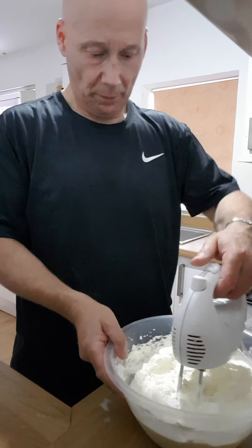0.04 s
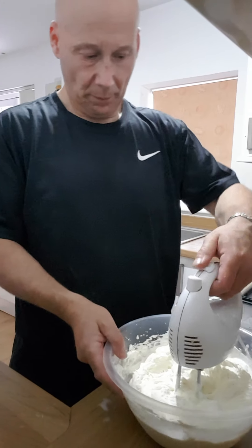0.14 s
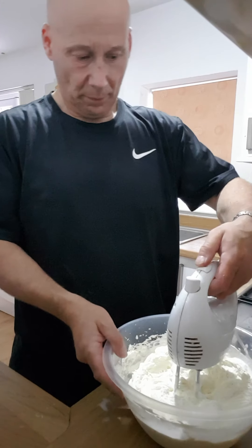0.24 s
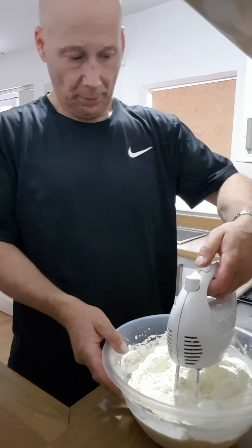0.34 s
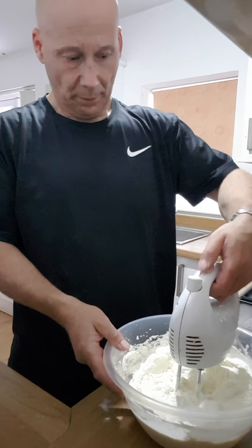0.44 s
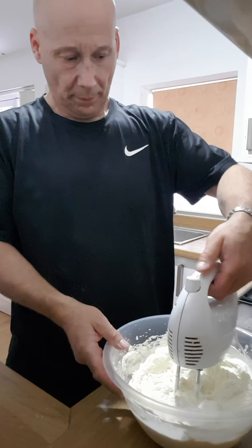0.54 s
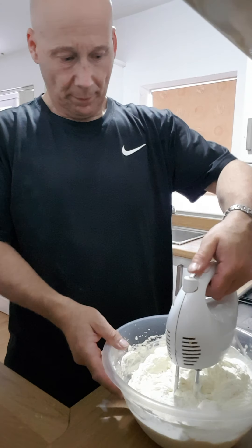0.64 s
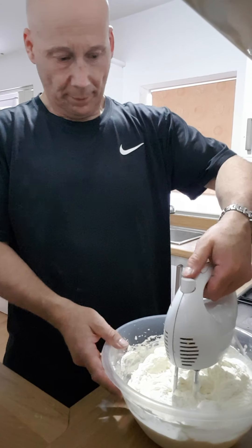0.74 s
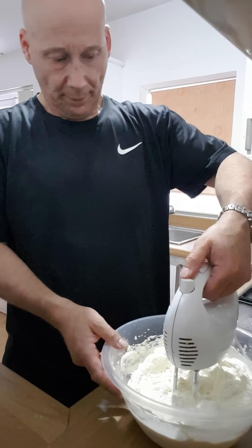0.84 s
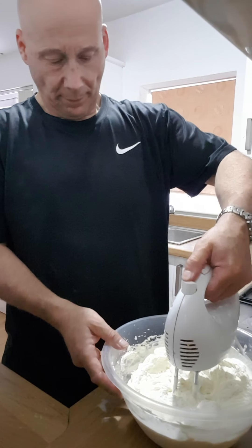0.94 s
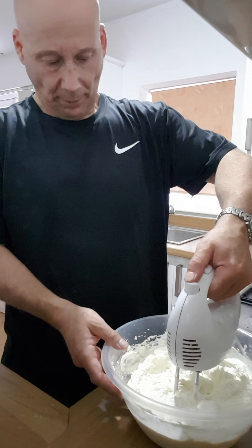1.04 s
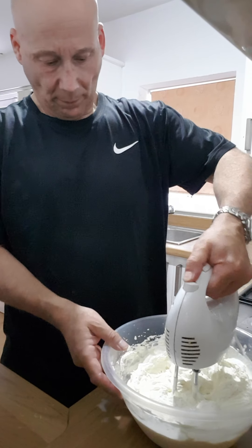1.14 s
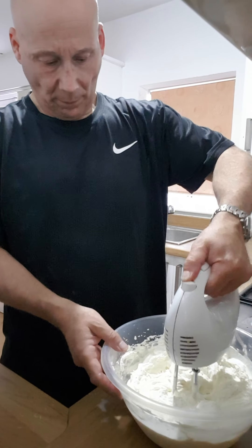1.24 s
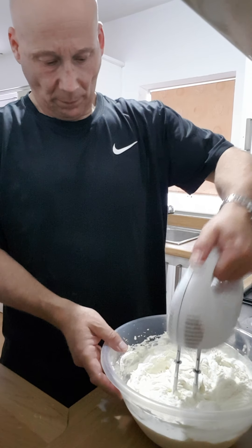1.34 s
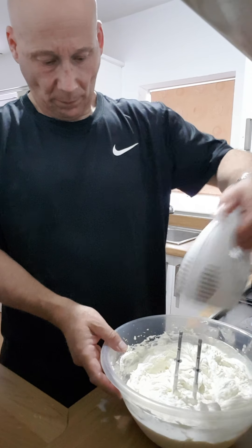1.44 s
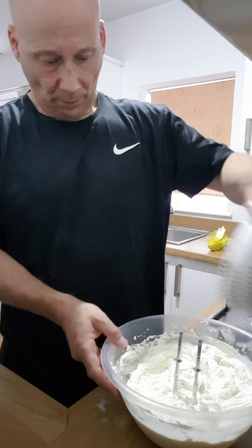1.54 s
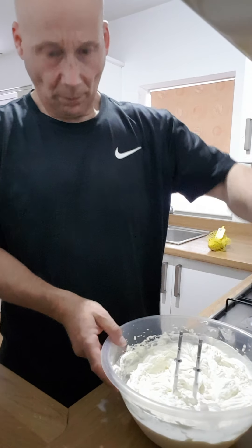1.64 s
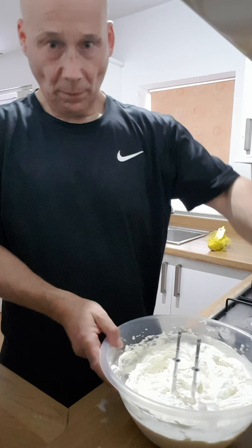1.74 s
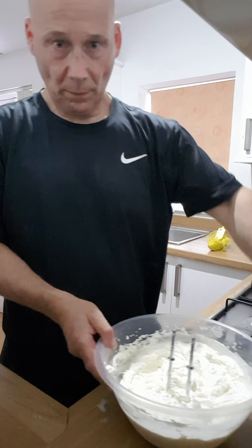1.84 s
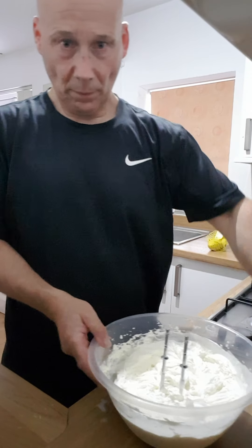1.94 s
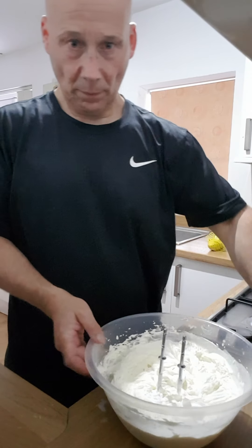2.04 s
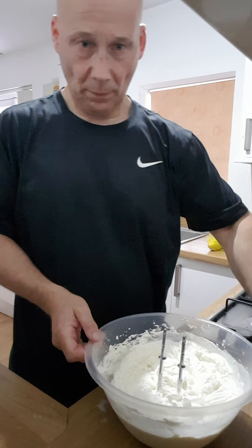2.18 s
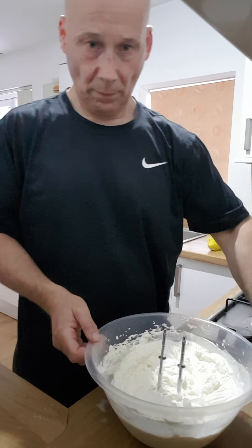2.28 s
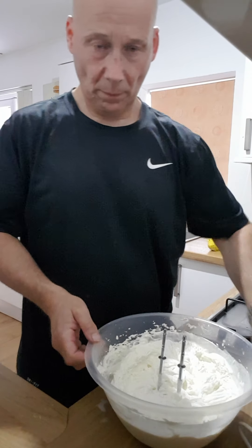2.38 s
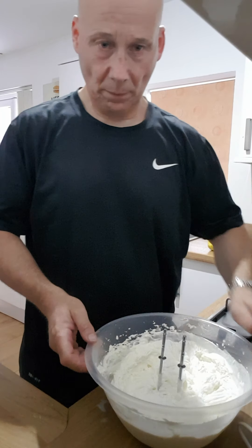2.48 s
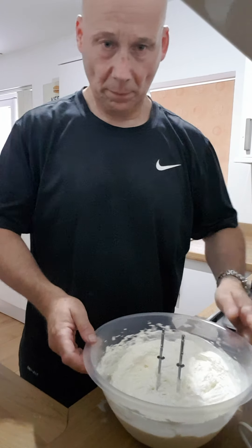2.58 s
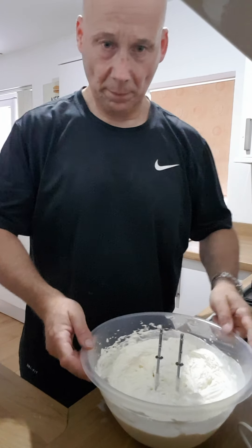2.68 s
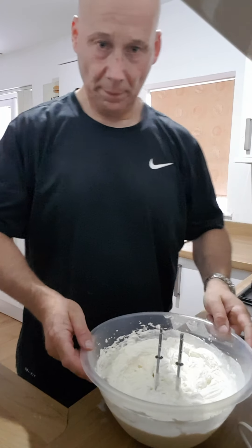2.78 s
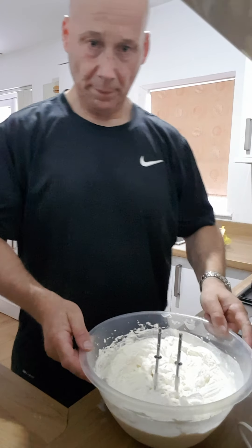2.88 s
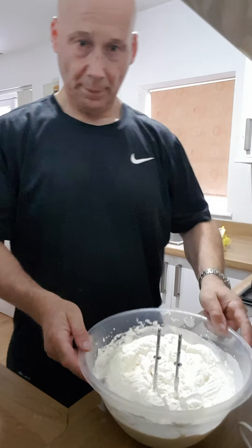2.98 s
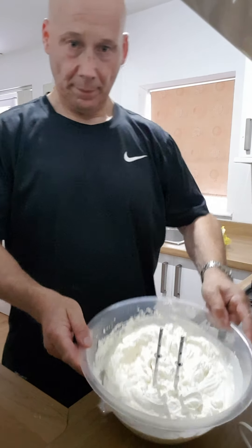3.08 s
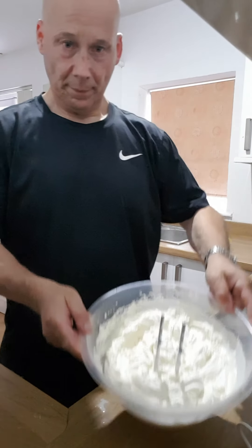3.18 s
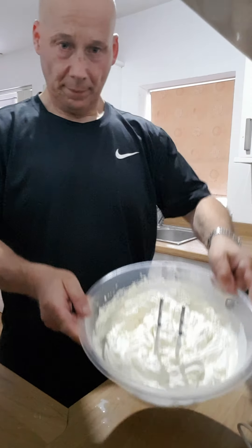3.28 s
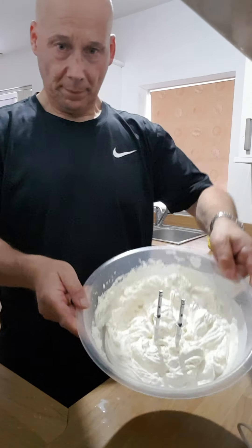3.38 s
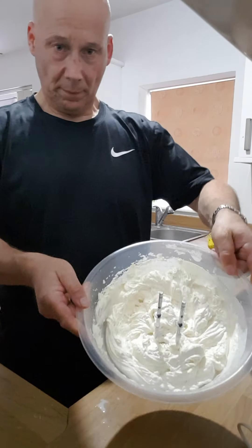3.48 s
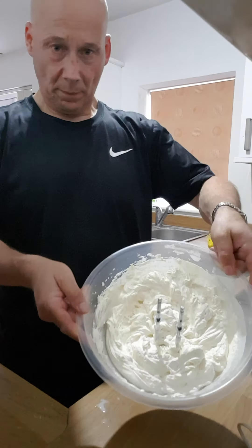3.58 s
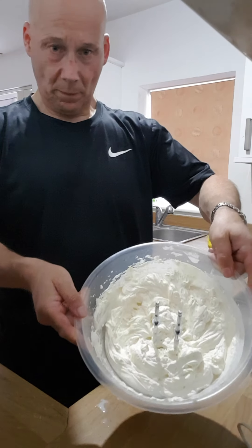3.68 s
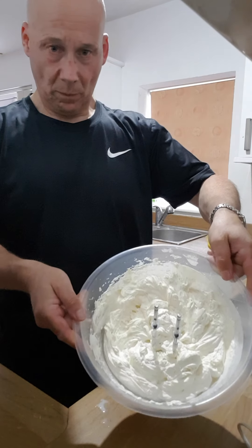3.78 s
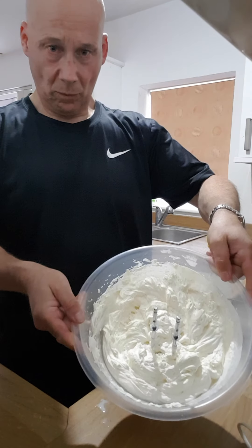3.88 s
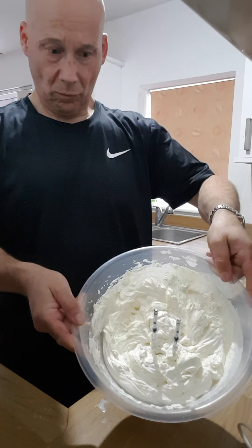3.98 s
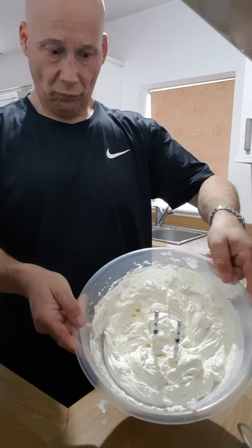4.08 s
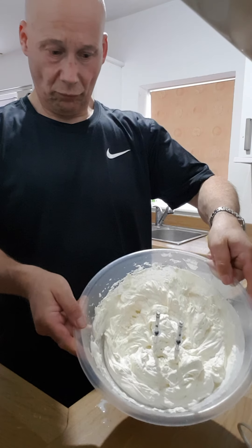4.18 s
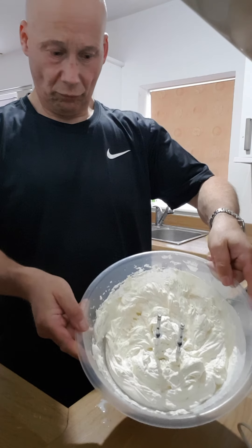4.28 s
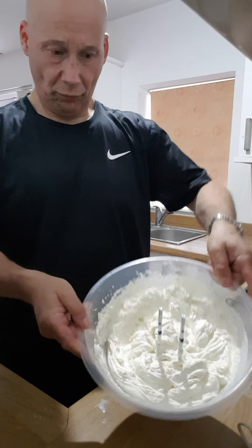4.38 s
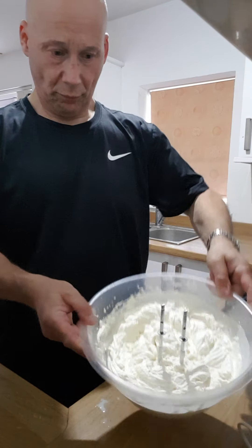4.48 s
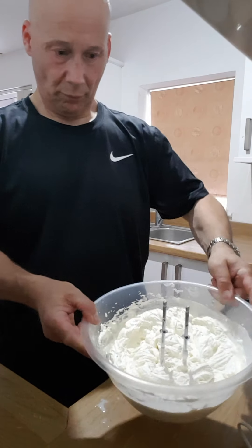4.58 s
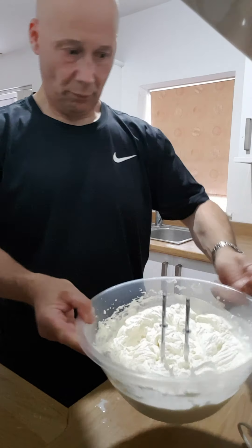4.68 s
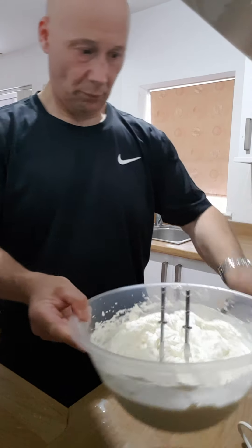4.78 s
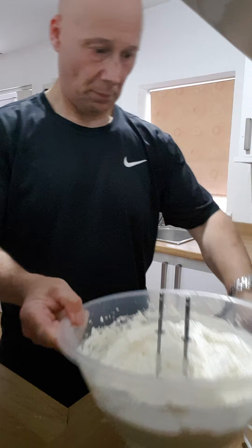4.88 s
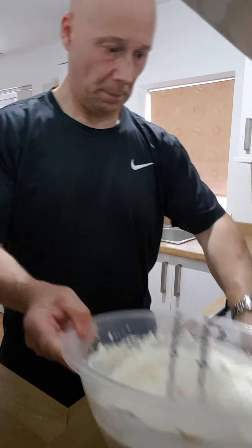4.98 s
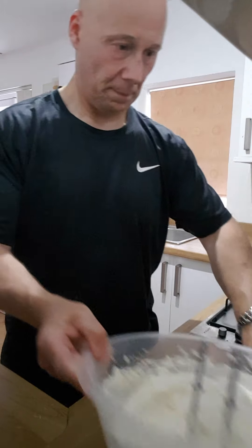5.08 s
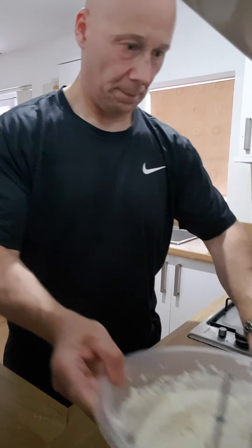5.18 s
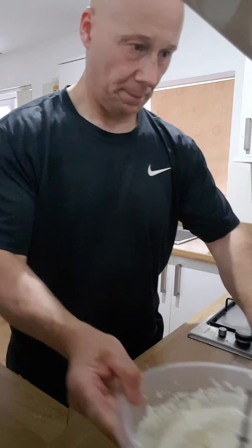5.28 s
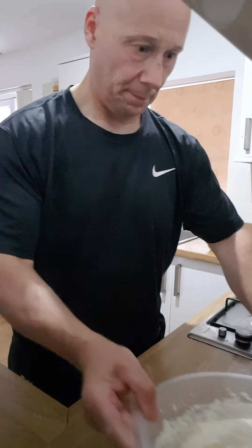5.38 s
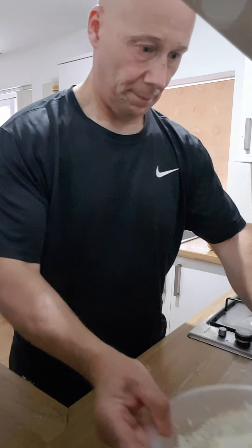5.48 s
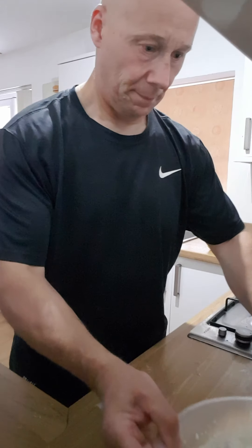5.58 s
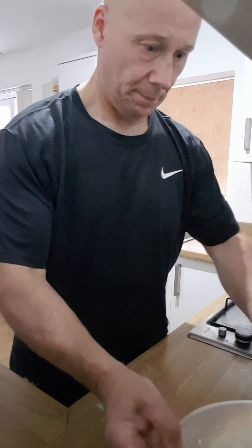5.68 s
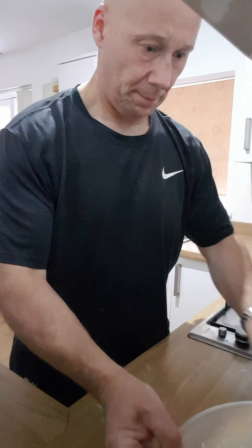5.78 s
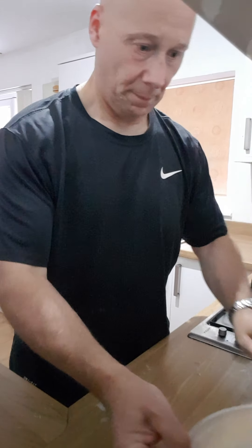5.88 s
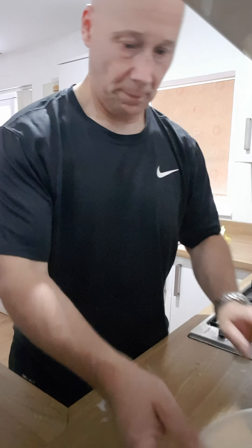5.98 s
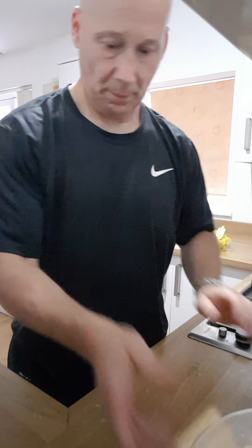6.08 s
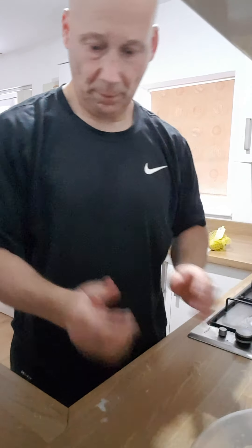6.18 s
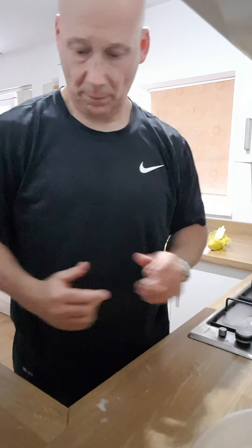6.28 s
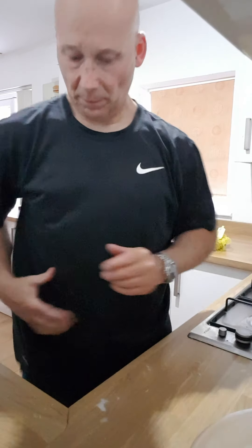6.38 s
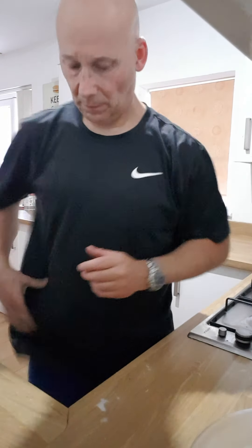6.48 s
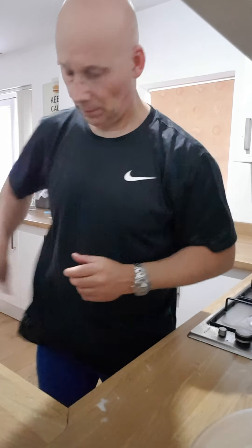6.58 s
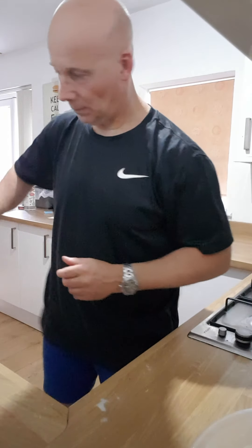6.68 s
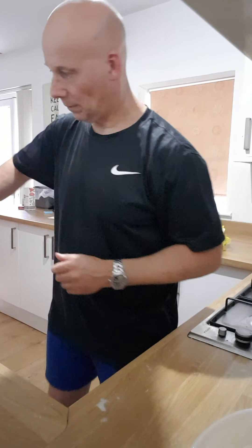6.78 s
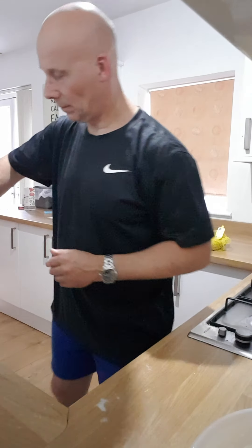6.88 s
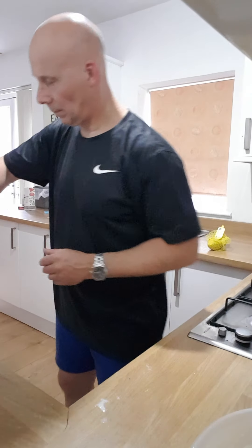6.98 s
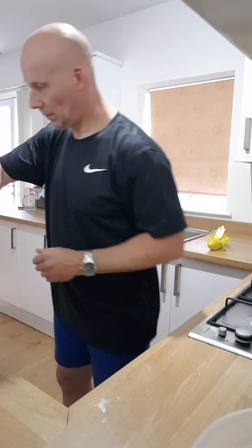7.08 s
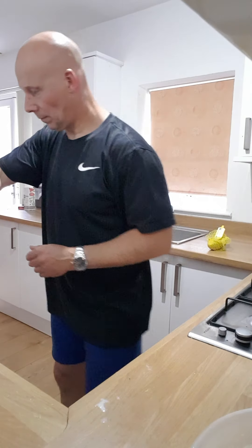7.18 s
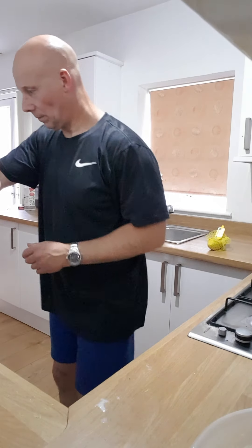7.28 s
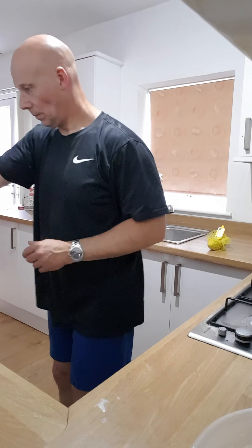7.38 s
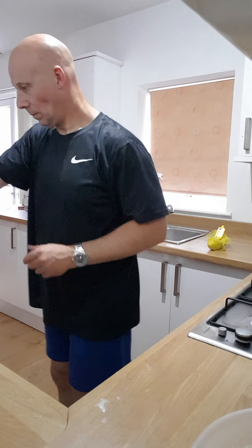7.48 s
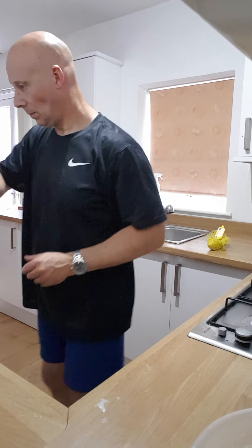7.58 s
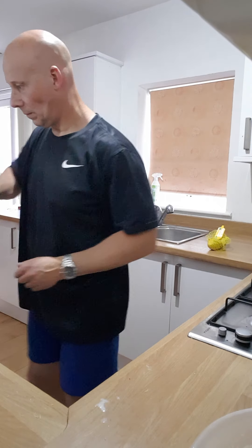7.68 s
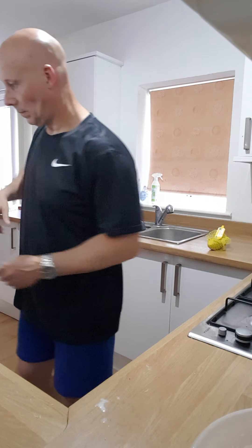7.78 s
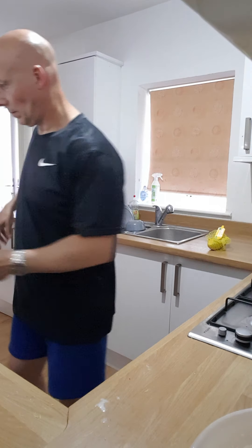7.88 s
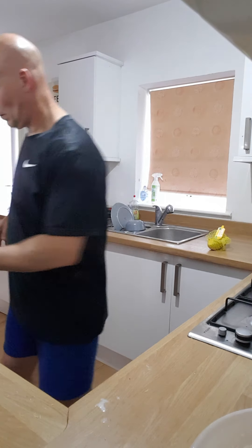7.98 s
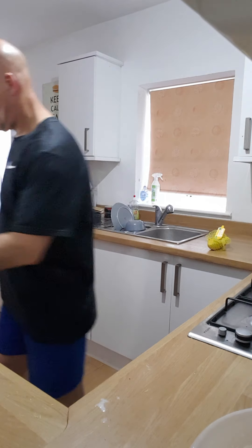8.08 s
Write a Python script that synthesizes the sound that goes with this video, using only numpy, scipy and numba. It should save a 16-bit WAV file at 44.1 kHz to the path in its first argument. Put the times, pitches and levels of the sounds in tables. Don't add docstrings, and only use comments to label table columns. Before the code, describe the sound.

Light plastic ticks and low thumps come first, growing into sharp unlatching clicks and a loud, deep set-down thud. After a couple of very quiet seconds with barely a touch, a bowl drags roughly over wood, jerks and knocks down heavily several times. Faint rustling and a hollow drawer rumble with small clicks finish it. Stereo phone microphone lying on the worktop, hard-walled kitchen, faint hum.

```python
import sys
import numpy as np
from scipy import signal
from scipy.fft import rfft, irfft
from scipy.io import wavfile
from scipy.ndimage import uniform_filter1d
from numba import njit

SR = 44100
rng = np.random.default_rng(int(sys.argv[2]) if len(sys.argv) > 2 else 0)


def amplitude_ratio(level_db):
    exponent = np.asarray(level_db, float) / 20
    return 10 ** exponent


def waveform_to_disk(signal):
    frames = np.transpose(np.atleast_2d(signal))
    scaled = np.clip(frames, -1, 1) * 32767
    samples = np.round(scaled).astype(np.int16)
    wavfile.write(sys.argv[1], SR, samples)


N = 358825


def band(x, lo_hz, hi_hz):
    return signal.sosfilt(signal.butter(2, [lo_hz, hi_hz], "band", fs=SR, output="sos"), x)


def unit(x):
    return x / np.sqrt(np.mean(x ** 2))


def spectrum_db(points):
    hz, db = np.transpose(points)
    return np.interp(np.log(np.fft.rfftfreq(N, 1 / SR) + 1), np.log(hz), db)


def resonate(x, peaks):
    out = 0
    for hz, width_hz, db in peaks:
        b, a = signal.iirpeak(hz, hz / width_hz / 1.205, fs=SR)
        once = signal.lfilter(b, a, x)
        out = out + amplitude_ratio(db) * signal.lfilter(b, a, once)
    return out


def controls(table):
    s, *columns = np.transpose(table)
    t = np.arange(N) / SR
    is_on = (t > s[0]) & (t < s[-1] + 0.02)
    gate = uniform_filter1d(1.0 * is_on, size=400)
    return gate, [np.interp(t, s, c) for c in columns]


def swell(s, rise_s, fall_s):
    t = np.arange(N) / SR - s
    return np.exp(np.minimum(t / rise_s, -t / fall_s))


def grit(rate_hz, scatter_db):
    k = int(SR / rate_hz)
    steps = np.repeat(rng.standard_normal(N // k + 1), k)[:N]
    slips = uniform_filter1d(steps, k)
    return amplitude_ratio(scatter_db * slips) * rng.standard_normal(N)


def shake(peaks):
    return unit(resonate(grit(25, 2.0), peaks))


def ring(modes, t):
    return sum(amplitude_ratio(db - 60 * t / t60) * np.sin(2 * np.pi * hz * t) for hz, db, t60 in modes)


def add(out, s, sound):
    i = int(s * SR)
    out[i:i + len(sound)] += sound[:N - i]


# frequency in Hz, level in dB per Hz.
HUM = [(12, -47.5), (20, 4.5), (68, -7.5), (101, -5), (127, -4.5), (198, -12), (319, -10.5), (367, -18.5),
       (738, -16), (1330, -28), (1440, -22.5), (1760, -28.5), (2600, -29), (4940, -40), (16000, -35)]
# frequency in Hz, level in dB.
WHINE = [(14500, -93)]
HUM_DB = -60.5


def hum():
    hz = np.maximum(np.fft.rfftfreq(N, 1 / SR), 1)
    colour = amplitude_ratio(spectrum_db(HUM))
    mid, side = (colour * rfft(rng.standard_normal(N)) for _ in range(2))
    side = side * np.clip(hz / 900, 0.15, 1)
    scale = amplitude_ratio(HUM_DB) / np.sqrt(np.mean(irfft(mid, N) ** 2))
    whine = sum(amplitude_ratio(db) * np.sin(2 * np.pi * f * np.arange(N) / SR) for f, db in WHINE)
    return scale * irfft(np.array([mid + side, mid - side]), N) + whine


# time in seconds, peak in dB, boom in Hz,
# upper modes in relative dB, knock in relative dB.
MIXER_THUMPS = [(0.089, -18.5, 102.6, -18, -14.5), (0.233, -41, 96.9, -32, -28),
                (0.547, -41, 105, -33, -16), (0.596, -45.5, 105, -25, -18), (0.785, -42, 102, -17, -24),
                (1.055, -30.5, 108, -21, -20), (1.193, -15.5, 108, -35, -16.5),
                (1.332, -33.5, 109.5, -27, -24), (1.412, -37.5, 98.5, -5, -4), (1.723, -57, 99, 2.5, 6),
                (2.033, -4.5, 105, -4.5, -20.5), (2.063, -19.5, 113.6, -1, -16.5),
                (2.169, -30.5, 102, 0, -32), (2.387, -20.5, 105, -2, -48), (2.56, -46.5, 90.3, -2, -6),
                (2.691, -60, 102, -7, -1)]
BOWL_THUMPS = [(3.004, -61.5, 120.5, 5, 10.5), (3.079, -54, 109.2, 2, 6), (3.264, -63, 115, 4.5, 11),
               (3.489, -68, 94, 8, 16), (5.457, -13.5, 103, -5.5, -23), (5.609, -41, 99.6, -32, -23.5),
               (5.71, -10, 98.4, -10, -12.5), (5.764, -22.5, 105, -28, -32), (5.874, -8.5, 105, -6, -14),
               (5.967, -42, 110, -15, -17), (6.032, -30.5, 108, -21, -35)]
DRAWER_THUMPS = [
    (6.498, -45, 118.6, -24, -22),
    (6.538, -44, 113, -8.5, -11.5),
    (6.806, -44, 91.2, 5.5, 1.5),
    (7.053, -36, 117, 12.5, 2.5),
    (7.209, -48.5, 102, 13, 8.5),
    (7.3, -45.5, 114, 17.5, 7.5),
    (7.442, -30, 89.5, -9, -29),
    (7.689, -37.5, 118, 4.5, -29),
    (7.825, -37.5, 126, -30, -15),
]
REBOUND_S = 0.054, 0.04, 0.045


def blows():
    tables = MIXER_THUMPS, BOWL_THUMPS, DRAWER_THUMPS
    return [(*row, hold_s) for table, hold_s in zip(tables, REBOUND_S) for row in table]


# time in seconds, length in seconds, rustle in dB, hiss in dB,
# soft body in dB.
HANDS = [(0.069, 0.3, -61, -64, -61), (0.451, 0.46, -72, -79.5, -69.5), (1.017, 0.09, -61, -70, -53.5),
         (1.28, 0.12, -64, -64.5, -58.5), (1.465, 0.04, -49, -72, -47), (1.532, 0.1, -61, -57.5, -53),
         (1.766, 0.27, -59.5, -66, -56), (1.928, 0.17, -68, -61, -63.5), (2.109, 0.087, -47, -61.5, -31),
         (2.25, 0.23, -66, -68.5, -50), (2.389, 0.11, -53, -91, -50), (2.634, 0.2, -66, -69, -64.5),
         (2.84, 0.25, -67.5, -70, -74.5), (3.074, 0.059, -59.5, -60, -61.5),
         (7.448, 0.057, -48.5, -64, -70), (7.952, 0.025, -75, -80, -47), (5.922, 0.12, -54.5, -55.5, -51.5),
         (5.987, 0.13, -56, -63.5, -53), (6.269, 0.17, -61.5, -64, -64), (6.5, 0.16, -64, -59.5, -66),
         (6.6, 0.1, -65, -82, -68.5), (6.808, 0.03, -57.5, -75, -70), (6.952, 0.175, -66.5, -70, -64),
         (7.351, 0.11, -73, -60, -74)]
BRUSH_RISE, BRUSH_FALL = 0.26, 0.45
BRUSH_FELT_DB = 7.5
AFTERSHAKE_DB, AFTERSHAKE_RISE_S, AFTERSHAKE_FALL_S = -21, 0.017, 0.07


def hands():
    x = grit(78, 1.7)
    low = shake([(102.1, 48, 4.5), (159.1, 110, -16.0)])
    parts = unit(band(x, 1100, 3300)), unit(band(x, 6100, 13000)), unit(band(x, 600, 950))
    air, press = 0, 0
    for s, db, *_ in blows():
        shudder = swell(s + 0.052, AFTERSHAKE_RISE_S, AFTERSHAKE_FALL_S)
        press = press + amplitude_ratio(db + AFTERSHAKE_DB) * shudder
    for s, length_s, *dbs in HANDS:
        shape = swell(s, BRUSH_RISE * length_s, BRUSH_FALL * length_s)
        air = air + shape * sum(amplitude_ratio(db - 3.5) * part for db, part in zip(dbs, parts))
        press = press + shape * amplitude_ratio(min(dbs[2], -58) + BRUSH_FELT_DB)
    return air, press * low


# time in seconds, speed in dB, load in dB.
DRAWER = [
    [(7.03, -82, -72), (7.052, -60, -62), (7.142, -68.5, -53), (7.22, -55.5, -37.5), (7.27, -56.5, -40)],
    [(7.29, -60, -49.5), (7.3, -40, -50), (7.36, -39, -40), (7.46, -51, -38), (7.488, -38.5, -35.5),
     (7.52, -51, -39), (7.63, -54, -38.5), (7.93, -68, -47.5), (8.137, -66, -51.5)],
]
# frequency in Hz, width in Hz, level in dB.
DRAWER_PEAKS = [(685, 236, 10), (890, 380, 1.5), (485, 61, -5)]
RUNNER_DB, RUNNER_HISS_DB = -35, -40
RUNNER_SHARE = 0.57


def drawer():
    roll = unit(resonate(grit(60, 2.5), DRAWER_PEAKS))
    scrape = amplitude_ratio(RUNNER_DB) * unit(band(grit(48, 1.1), 1400, 3330))
    hiss = amplitude_ratio(RUNNER_HISS_DB) * unit(band(grit(40, 2.2), 5500, 16110))
    runner = scrape + hiss
    carcass = shake([(65, 30, 1.0), (108, 48, -2.0), (146.8, 14.0, -3.5), (240, 100, -14.0)])
    air, felt = 0, 0
    for pull in DRAWER:
        gate, (speed_db, load_db) = controls(pull)
        air = air + gate * (amplitude_ratio(speed_db) * roll + amplitude_ratio(RUNNER_SHARE * speed_db) * runner)
        felt = felt + gate * amplitude_ratio(load_db) * carcass
    return air, felt


# time in seconds, speed in dB, weight in dB.
SLIDE = [
    (5.12, -85, -66),
    (5.22, -57.5, -31.5),
    (5.32, -40.5, -34.5),
    (5.395, -39.5, -31),
    (5.415, -26.5, -37),
    (5.432, -40, -34.5),
    (5.452, -30, -43),
    (5.535, -44.5, -33),
    (5.69, -67, -53.5),
]
# frequency in Hz, width in Hz, level in dB.
SLIDE_PEAKS = [(1600, 260, 4), (2130, 890, 7.5), (3120, 2800, -2.5), (4700, 2200, -22)]
SLIDE_HISS_DB, SLIDE_BODY_DB = -13, -5.5


def slide():
    gate, (speed_db, weight_db) = controls(SLIDE)
    scrape = unit(resonate(grit(140, 2.8), SLIDE_PEAKS))
    hiss = amplitude_ratio(SLIDE_HISS_DB) * unit(band(grit(60, 1.3), 6700, 16000))
    body = amplitude_ratio(SLIDE_BODY_DB) * unit(band(grit(60, 5.4), 297, 930))
    felt = shake([(105, 9.8, 0.5), (158, 34, -18.5)])
    return gate * amplitude_ratio(speed_db) * (scrape + hiss + body), gate * amplitude_ratio(weight_db) * felt


# time in seconds, peak in dB, hollowness in dB, brightness in dB,
# ring t60 in seconds.
LATCH_TAPS = [(0.0817, -48.5, 10.5, -2, 0.041), (0.16, -49.5, -34, -27, .06),
              (0.4424, -55.5, -22, -23, .05), (0.502, -59, 5.5, -13.5, .06),
              (0.5643, -46.5, -6.5, -38, 0.042), (0.9927, -47.5, -26, -25, 0.041),
              (1.0185, -38.5, -44, -9, 0.078), (1.058, -44.5, -11, -48, 0.067),
              (1.069, -46.5, -4, -39, 0.058), (1.1868, -48.5, 8.5, 11, 0.1), (1.1947, -34.5, -29, 5, 0.053),
              (1.2193, -42, 4.5, -4, 0.076), (1.2497, -45.5, 0, -12, .06), (1.3538, -41.5, 0, -14.5, 0.05),
              (1.403, -28.5, -9.5, -2, 0.033), (1.4348, -21.5, -23.5, -15, .04),
              (1.5258, -32, -7.5, -20, .05), (1.5892, -38, -0.5, -32, 0.023),
              (1.7218, -43, -3, -19.5, 0.048), (1.7311, -28.5, -4.5, -1, 0.037),
              (1.924, -38, -3.5, -11, 0.026)]
MIXER_TAPS = [
    (2.0273, -16.5, 6.5, -18.5, 0.08),
    (2.063, -26.5, 13, -19, 0.093),
    (2.286, -33.5, -26, -17.5, 0.098),
    (2.3096, -42.5, -5, -18.5, 0.054),
    (2.362, -29.5, 0.5, -4, 0.067),
    (2.3802, -30, -9, -37, .04),
    (2.4826, -49, -18, -5, .08),
    (2.5619, -35, -16, -21.5, 0.025),
]
BOWL_TAPS = [
    (3.005, -65, -5, -9.5, 0.076),
    (3.265, -74, 12, -7, 0.062),
    (3.4904, -74, 6, -10, 0.024),
    (4.7346, -43.5, -8, -15, 0.033),
    (5.443, -28, -28, 2, .03),
    (5.7074, -28, 1, -33, 0.029),
    (5.765, -39, 1.5, -19, 0.074),
    (5.8716, -29, 2.5, -20.5, 0.047),
    (6.0786, -50.5, -6, -16, 0.056),
]
DRAWER_TAPS = [
    (6.8061, -47.5, -2, -4, 0.044),
    (7.0274, -61, -5, 8, 0.047),
    (7.0498, -55, 7.5, 1, 0.086),
    (7.0892, -51, 0.5, -6, 0.074),
    (7.178, -48, -2, -6, 0.098),
    (7.298, -55.5, 18, -25, 0.066),
    (7.7767, -50.5, -16, -5.5, 0.042),
    (7.9494, -60.5, 13, -13.5, .06),
    (8.0878, -48, 1.5, -22, 0.15),
]
EDGE_DB, EDGE_PER_BRIGHT = 2, 0.59


def ticks():
    return [(s, db, hollow_db, EDGE_DB + EDGE_PER_BRIGHT * bright_db, bright_db, t60_s)
            for s, db, hollow_db, bright_db, t60_s in [*LATCH_TAPS, *MIXER_TAPS, *BOWL_TAPS, *DRAWER_TAPS]]


# frequency in Hz, width in Hz, level in dB (only the frequency is played).
SHELL = [(427.3, 0, 0), (482.0, 0, 0), (649.0, 0, 0), (657, 0, 0), (781, 0, 0), (1440, 120, 0),
         (2390, 96, -6), (3127, 330, -5), (3770, 280, -8), (5620, 110, -13), (7090, 250, -16),
         (7800, 110, -22)]
# low edge in Hz, high edge in Hz.
TAP_EDGES_HZ = (950, 2300), (430, 950), (2200, 5000), (5500, 11000)


def taps():
    out, t = np.zeros(N), np.arange(SR // 4) / SR
    for s, db, hollow_db, edge_db, bright_db, t60_s in ticks():
        chance = rng.standard_normal((len(SHELL), 2))
        modes = [(hz * (1 + 0.02 * detune), 5 * level, t60_s * (1000 / hz) ** 0.23)
                 for (hz, _, _), (detune, level) in zip(SHELL, chance)]
        rattle = rng.standard_normal(len(t)) * (amplitude_ratio(-60 * t / t60_s) + 2.9 * np.exp(-t / 0.0017))
        click = amplitude_ratio(17) * np.exp(-t / 0.00004)
        blow = amplitude_ratio(-18) * ring(modes, t) + rattle + click
        for (lo_hz, hi_hz), rel_db in zip(TAP_EDGES_HZ, (0, hollow_db, edge_db, bright_db)):
            part = band(blow, lo_hz, hi_hz)
            add(out, s - 0.001, amplitude_ratio(db + rel_db + 4.0) * part / np.abs(part).max())
    return out


# frequency in Hz, level in dB, t60 in seconds.
WORKTOP = [(67.5, -15, 0.52)]
WORKTOP_UPPER = [(161.2, -4, 0.29), (149.7, -0.5, 0.13)]
KNOCK = [(227.6, 10.5, .12), (331.4, 0, 0.24), (275.8, -1, 0.23)]
BOOM_T60_S, BOOM_LEFT_DB = 0.33, -14


def thumps():
    out, t = np.zeros(N), np.arange(SR // 2) / SR
    rise = 1 - np.exp(-t / 0.0035)
    upper, knock = rise * ring(WORKTOP_UPPER, t), ring(KNOCK, t)
    upper, knock = upper / upper.max(), knock / knock.max()
    for s, db, hz, upper_db, knock_db, hold_s in blows():
        held = amplitude_ratio(BOOM_LEFT_DB * (1 + np.tanh((t - hold_s) / 0.016)) / 2)
        boom = rise * held * ring([(hz, 0, BOOM_T60_S), *WORKTOP], t)
        blow = boom / boom.max() + amplitude_ratio(upper_db) * upper + amplitude_ratio(knock_db + 5.5) * knock
        add(out, s - 0.004, -amplitude_ratio(db) * blow)
    return out


# frequency in Hz, left minus right in dB.
PORT_BALANCE = [(200, -2), (350, 5), (750, 5), (1400, 1), (3000, 2), (10000, 2.5)]
BOUNCE_LAGS = (97, 233), (131, 311)


def nearby(air):
    turn = np.exp(-2j * np.pi * np.fft.rfftfreq(N))
    direct = 0.8
    paths = []
    for lags in BOUNCE_LAGS:
        allpasses = [(direct - turn ** lag) / (1 - direct * turn ** lag) for lag in lags]
        paths.append(np.prod(allpasses, axis=0))
    balance = amplitude_ratio(np.outer([0.5, -0.5], spectrum_db(PORT_BALANCE)))
    return amplitude_ratio(4.5) * irfft(np.array(paths) * balance * rfft(air), N)


@njit
def walls(x, lags, gain, damp):
    line, soft, out = np.zeros((8, 4096)), np.zeros(8), np.zeros((2, len(x)))
    for i in range(len(x)):
        total = 0.
        for k in range(8):
            soft[k] += (1 - damp) * (gain[k] * line[k, (i - lags[k]) & 4095] - soft[k])
            total += soft[k]
            out[k % 2, i] += soft[k]
        for k in range(8):
            line[k, i & 4095] = x[i] + soft[k] - total / 4
    return out


ROOM_T60_S, ROOM_DAMP, ROOM_DB = 0.42, 0.3, -19
LEFT_LAG_SAMPLES, LEFT_BASS_DB = 7, -1.0


def scene():
    rubs = slide(), drawer(), hands()
    air = taps() + sum(rub_air for rub_air, _ in rubs)
    felt = band(thumps() + sum(rub_felt for _, rub_felt in rubs), 59, 1700)
    near = nearby(air)
    lags = np.array([331, 457, 613, 797, 1009, 1277, 1567, 1931])
    gain = amplitude_ratio(-60 * lags / SR / ROOM_T60_S)
    echo = walls(near[1] + amplitude_ratio(-16.5) * felt, lags, gain, ROOM_DAMP)
    body = np.array([amplitude_ratio(LEFT_BASS_DB) * np.roll(felt, LEFT_LAG_SAMPLES), amplitude_ratio(-LEFT_BASS_DB) * felt])
    return near + body + amplitude_ratio(ROOM_DB) * echo + hum()


def roll_off(x):
    return signal.sosfilt(signal.butter(12, 16800, fs=SR, output="sos"), x)


# frequency in Hz, level in dB.
MIC = [(7600, 0.5), (8800, -8), (10200, -7.5), (12500, -3), (15500, -0.5)]


def record(dry):
    heard = irfft(amplitude_ratio(spectrum_db(MIC)) * rfft(dry), N)
    return roll_off(np.tanh(heard))


dry = scene()
out = record(dry)
waveform_to_disk(out)
```